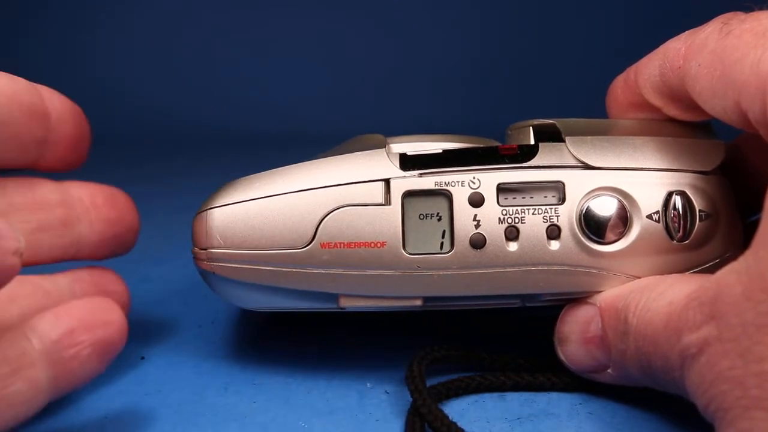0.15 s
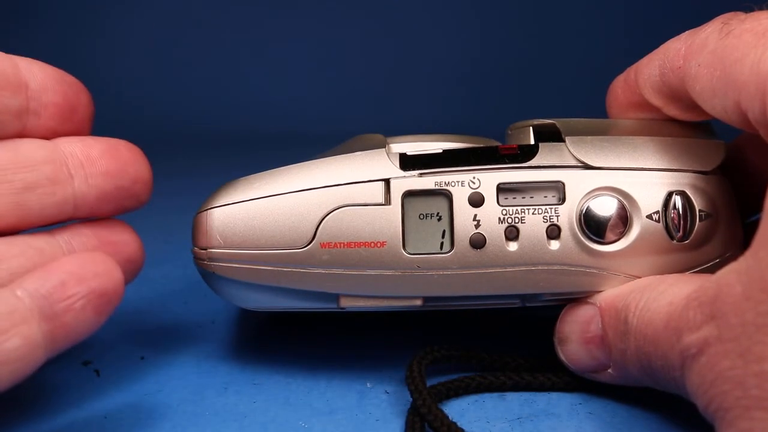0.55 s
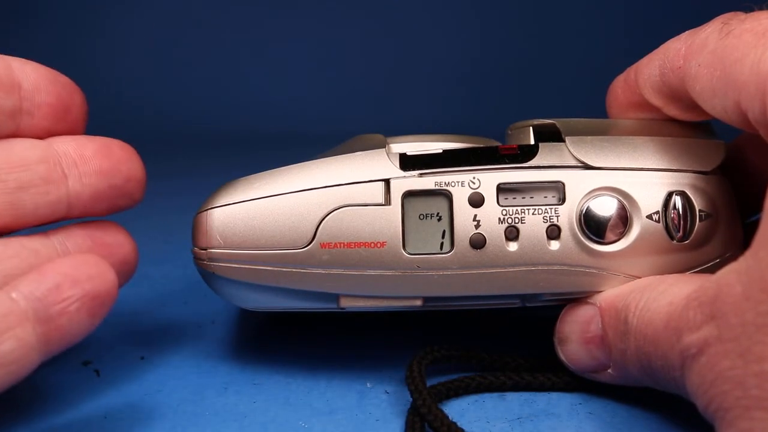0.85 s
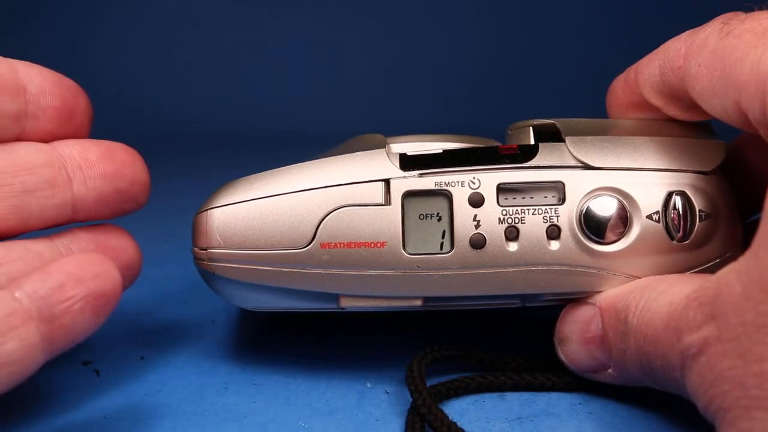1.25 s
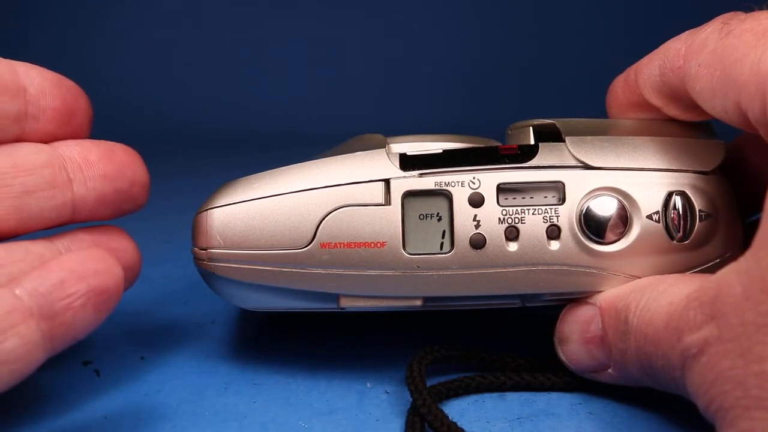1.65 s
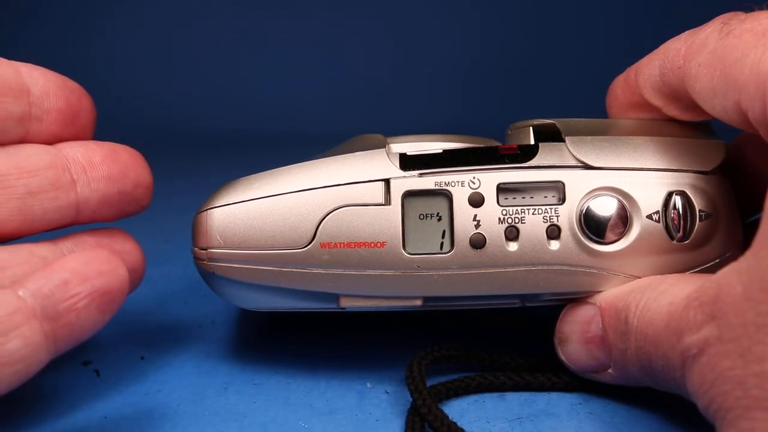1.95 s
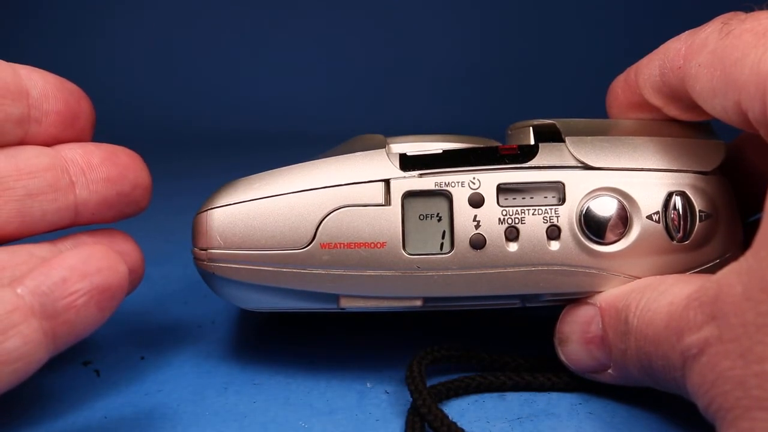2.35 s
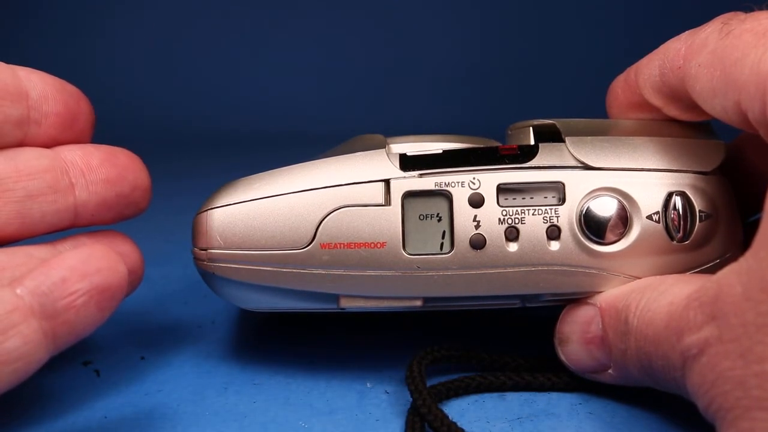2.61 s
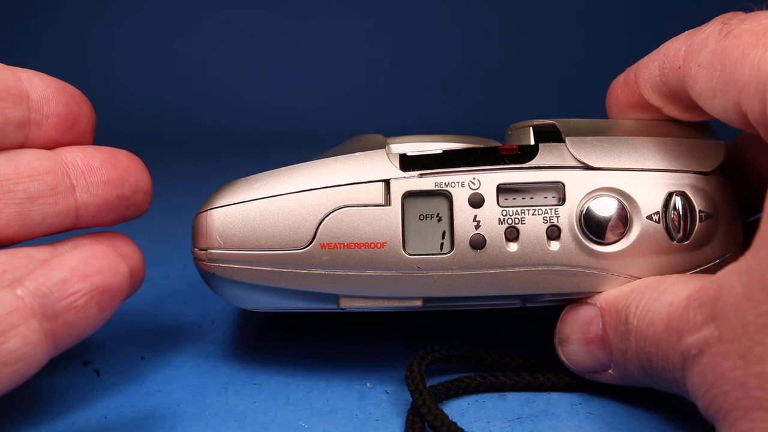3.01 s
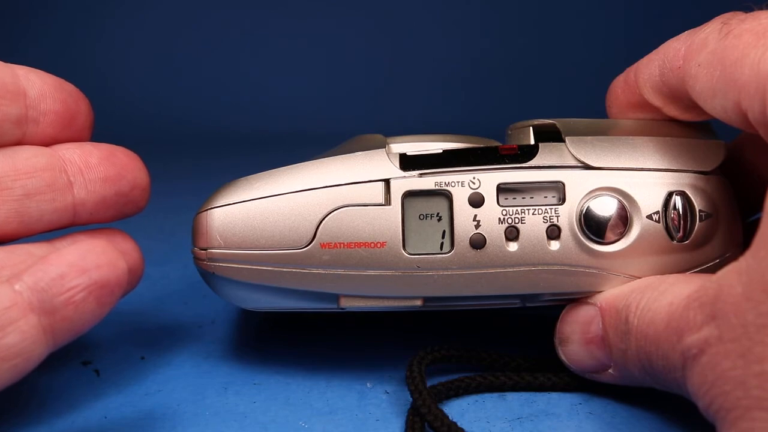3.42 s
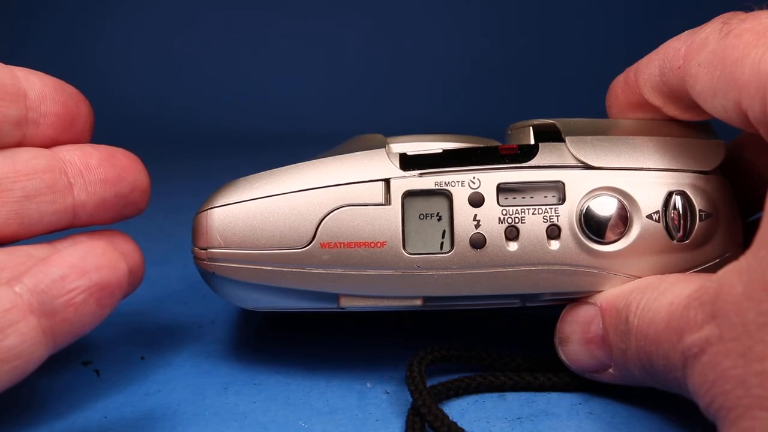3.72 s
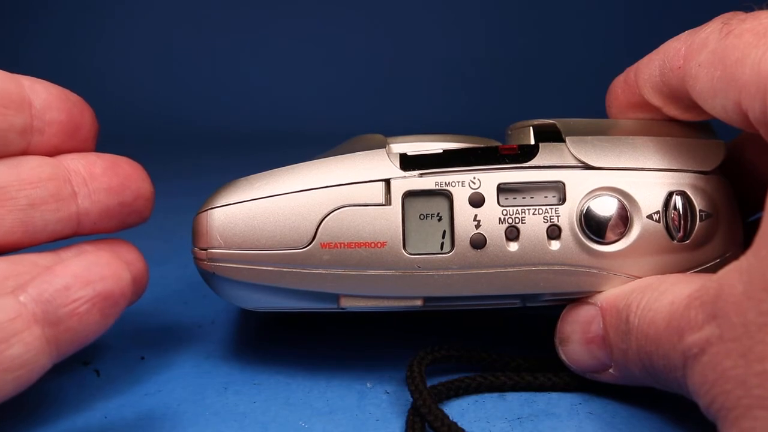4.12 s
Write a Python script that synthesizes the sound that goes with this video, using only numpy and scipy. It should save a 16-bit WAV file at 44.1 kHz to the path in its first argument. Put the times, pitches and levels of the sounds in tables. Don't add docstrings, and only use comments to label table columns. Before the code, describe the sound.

Close-up film rewind: a buzzing, gritty electric whir with slight pitch wavers, a tiny latch click, then a strained patch and freer, faster running.

```python
import sys
import numpy as np
from scipy import signal
from scipy.io import wavfile

SR = 44100
rng = np.random.default_rng(int(sys.argv[2]) if len(sys.argv) > 2 else 0)


def undo_db(level):
    steps = np.asarray(level, float) / 20
    return 10 ** steps


def log_audio(samples):
    frames = np.atleast_2d(samples).T
    limited = np.clip(frames, -1, 1)
    pcm = np.round(limited * 32767).astype(np.int16)
    wavfile.write(sys.argv[1], SR, pcm)


N = 188174
TIME = np.arange(N) / SR


def in_time(rows):
    s, *columns = np.transpose(rows)
    return [np.interp(TIME, s, column) for column in columns]


def at_hz(points, hz):
    point_hz, values = np.transpose(points)
    return np.interp(np.log(hz), np.log(point_hz), values)


def humps(rows):
    return sum(size * np.exp(-((TIME - s) / half_s) ** 2) for s, size, half_s in rows)


def drift(rate_hz):
    r = np.exp(-2 * np.pi * rate_hz * 32 / SR)
    coarse = rng.standard_normal(N // 32 + 2002)
    slow = signal.lfilter([1], [1, -2 * r, r * r], coarse)[2000:]
    return np.interp(np.arange(N) / 32, np.arange(len(slow)), slow / slow.std())


def wobble(depth, rate_hz, height_share=0.66):
    height = 1 + depth * height_share * drift(rate_hz)
    turned = np.exp(1j * depth * drift(rate_hz))
    return height * turned / np.sqrt(1 + (depth * height_share) ** 2)


def resonate(x, hz, width_hz):
    r = np.exp(-np.pi * width_hz / SR)
    poles = [1, -2 * r * np.cos(2 * np.pi * hz / SR), r * r]
    return signal.lfilter([(1 - r * r) / 2, 0, (r * r - 1) / 2], poles, x)


def shaft_turns():
    # time in seconds, shaft speed in Hz.
    speed = [(0, 207.2), (.4, 207.6), (.52, 209.7), (.7, 207.2), (.85, 206.8), (1.1, 205), (1.25, 207.4),
             (1.7, 208.4), (2.0, 206.8), (2.2, 208), (2.84, 207.3), (3.17, 207), (3.36, 209.7),
             (3.62, 212.5), (4.02, 212.4), (4.12, 216), (4.27, 216.3)]
    # time in seconds, change of shaft speed in Hz, half length in seconds.
    snags = [
        (.23, -3, .05),
        (.94, -2.3, .05),
        (1.37, -1, .05),
        (2.33, -1.2, .05),
        (2.62, -1.6, .08),
        (2.93, 3.8, .05),
        (3.08, 1.8, .04),
        (3.45, -2, .05),
        (3.72, -1, .04),
        (3.86, .8, .05),
    ]
    shaft_hz, = in_time(speed)
    jitter = 1 + .0008 * drift(25.) + .0005 * drift(6.)
    return np.cumsum((shaft_hz + humps(snags)) * jitter) / SR


def press():
    # start, attack, hold and release, all in seconds.
    stages = (2.94, 0.063, 0.43, 0.36)
    start, attack, hold, release = stages
    free = np.clip((TIME - start - attack - hold) / release, 0, 1)
    return np.clip((TIME - start) / attack, 0, 1) - free, free


def order_swells(mesh_left_db, mesh_right_db, mesh3_db, bite_db, pressed, free):
    # time in seconds, swell in dB, half length in seconds.
    sings = [(.05, 0, 0.088), (.53, 3, .05), (.73, 3, 0.076), (1.0, 2.5, .08), (1.2, 7, 0.092),
             (1.45, 1, .1), (1.95, 5, 0.1), (2.3, 6.5, .08), (2.43, 3, .04), (2.6, 3, 0.074),
             (2.82, 4, .04), (3.72, 6, .06), (3.92, 3, 0.057)]
    let_go = np.clip((TIME - 4.06) / 0.059, 0, 1)
    mesh_db = 2.0 * drift(9.9) + 1.65 * bite_db + 5 * (free - let_go)
    flutter_hz = 12
    return {
        3: -2 * free + 3.5 * let_go + (0.16 + 1.5 * free) * drift(flutter_hz),
        4: -5 * free,
        5: 1 * (pressed + free) + 1.6 * drift(5.8),
        6: -8 * pressed + 2.5 * drift(flutter_hz),
        7: 7.5 * pressed + 0.52 * drift(3.3),
        10: [mesh_left_db + mesh_db + 0.26 * drift(2.4), mesh_right_db + mesh_db + 0.49 * drift(0.73)],
        18: -14 * free,
        20: 8 * pressed - 4.5 * free + humps(sings) + 1.5 * drift(12.0),
        21: 3 * (pressed + free) + 2 * drift(3.),
        30: mesh3_db + 0.34 * drift(3.9)}


def hum(turns, swell_db, mesh_lead, pressed):
    # multiple of shaft speed (10, 20, 30, 40 are tooth mesh), left dB, right dB, left lead in rad.
    orders = [(1, -54, -54, -0.2), (2, -63, -60, -0.2), (2.5, -73, -73, -0.2), (3, -45, -44, -0.4),
              (4, -56, -53, -0.2), (5, -53, -50, -0.2), (6, -49, -46, -0.5), (7, -53, -52, -0.3),
              (8, -61, -56, -1.7), (9, -54, -53, -1.3), (10, -41, -42, 0.9), (10.6, -68, -56, -0.7),
              (11.5, -58, -52, 0.1), (15, -57, -55, -2.5), (18, -58, -52.5, 2.1), (20, -47, -45, -0.7),
              (21, -56, -48, -2.7), (23, -64, -59, -0.2), (30, -60, -54, 0.7), (40, -71, -71, 0.6)]
    # multiple, left dB, right dB, left lead in rad.
    faint_orders = [(6.5, -63, -60, -.4), (6.67, -64, -61, -.4), (11, -61, -50, 0.), (12, -62, -54, 0.),
                    (13, -62, -55, 1.), (17, -63, -61, 1.8), (19, -63, -61, -.4), (25.5, -67, -65, -.4),
                    (27, -68, -64, .5)]
    shell_db = {5: .3, 6: .5, 10: 0, 20: .3, 21: 3.5, 23: 2, 30: 2.5}
    out = np.zeros((2, N))
    for order, left_db, right_db, lead in orders + faint_orders:
        high = order > 8.7
        meshing = order % 10 == 0
        steadied = 1 - .5 * pressed * (order == 20)
        depth = (.4 if high else .23 * np.sqrt(order / 3)) * steadied
        contact = wobble(depth, (8 if high else 22) + 2.2 * order, .4 if high else .9)
        path = wobble(.5 * high * steadied, 35)
        if order == 10:
            lead = mesh_lead
        else:
            lead = lead + high * (.3 if meshing else .7) * drift(1.5)
        uneven_load_db = 2.0 * drift(0.58) * (order > 2)
        curves = np.broadcast_to(swell_db.get(order, uneven_load_db), (2, N))
        curves = curves - curves.mean(axis=1, keepdims=True)
        levels = undo_db(curves + [[left_db], [right_db]] + high * 1.5 + shell_db.get(order, 0))
        tone = contact * np.exp(2j * np.pi * (order * turns + rng.random())) * np.sqrt(2)
        out += levels * [(tone * np.exp(1j * lead)).real, (tone * path).real]
    return out


def rattle(turns, rattle_db, pan_db, panel_db, free, bite_db):
    # Hz, width in Hz,
    # left and right in dB per Hz, left-right likeness 0-1, left lead in rad.
    case = [(660, 260, -75, -74, .95, -.3), (900, 400, -79, -78, .93, -.3), (1150, 300, -74, -72, .92, -.3),
            (1430, 350, -68, -68, .85, -.3), (1900, 300, -72, -66.5, .4, -.8),
            (2200, 350, -70, -60.5, .2, -.3), (2430, 380, -71.5, -62, .55, 0.),
            (2950, 500, -73, -65, .35, 1.9), (3350, 450, -70, -66, .45, -.6),
            (3750, 300, -71, -66.5, .35, 1.8), (4150, 450, -70, -68, .3, -.4),
            (4800, 350, -74, -72, .4, -.5), (5400, 500, -73, -71, .7, -.4), (5850, 400, -78, -72, .3, 2.)]
    frame = [(6150, 450, -75, -72.5, .2, .8), (6850, 600, -80.5, -75.5, .65, 1.),
             (7600, 600, -87, -85, .1, 1.8), (8250, 400, -83, -81, .2, .5), (8700, 400, -82, -88, .3, 1.3),
             (9400, 800, -87, -87, .4, 1.5), (10350, 400, -87, -85.5, .35, 2.2),
             (11000, 500, -89, -85.5, .35, 1.1), (11800, 450, -85, -87, .4, 1.8),
             (12300, 450, -87, -87, .25, -1.8), (13000, 500, -92, -93, .3, -.8),
             (13650, 600, -87.5, -87.5, .45, -2.4), (14400, 800, -88.5, -88.5, .55, 3.1),
             (15500, 1200, -91.5, -91, .35, 3.1)]
    plates = [(1700, 250, -76, -75, .7, -.4), (1970, 40, -65.5, -61, .5, .2), (2940, 50, -73, -63, .4, 2.),
              (2203, 30, -70, -59, .4, -.7), (1468, 40, -68, -67, .8, -.3)]
    # wheel turns per shaft turn, depth in dB.
    throb = [(1, 1.2), (3, .8), (1 / 6, .45), (1 / 3, .6), (.43, .5), (.0825, .6)]
    # time in seconds, extra impact in dB.
    catches = [(.657, 3), (.838, 8), (0.892, 2), (1.072, 6), (1.556, 7), (1.838, 9), (2.107, 10), (2.93, 7),
               (3.098, 3.5), (3.348, 6.5), (3.388, 3), (3.419, 2), (3.47, 4), (3.681, 6), (3.816, 5),
               (3.937, 8), (3.972, 6), (4.03, 8)]
    free_case_db = {660: -4, 900: -5, 1430: 1, 1700: 5, 2200: -1, 2430: -1.5, 2940: 1, 3350: -2.5, 3750:
                    -3.5, 4150: 1.5, 6850: 3}
    catch_s = 0.002
    throb_db = sum(depth_db * np.cos(2 * np.pi * ratio * turns) for ratio, depth_db in throb)
    catch_db = humps([(s, db, catch_s) for s, db in catches])
    sizes = undo_db(throb_db + 0.17 * drift(220.0) + rattle_db - rattle_db.mean())
    impacts = rng.standard_normal((3, 2, N)) * sizes * np.sqrt(SR / 2)
    back_panel_db = panel_db - rattle_db - np.mean(panel_db - rattle_db)
    sway_db = 0.69 * drift(4.2)
    out = np.zeros((2, N))
    for k, (hz, width_hz, left_db, right_db, alike, lead) in enumerate(case + frame + plates):
        left, other = resonate(resonate(impacts[k % 3], hz, width_hz), hz, width_hz)
        quarter_ahead = np.gradient(left) / np.sin(2 * np.pi * hz / SR)
        alike = np.clip(alike, 0, 1)
        shared = np.cos(lead) * left - np.sin(lead) * quarter_ahead
        right = alike * shared + np.sqrt(1 - alike ** 2) * other
        level_db = free_case_db.get(hz, 0) * free
        if 2700 < hz < 3200:
            level_db = level_db + back_panel_db
        if 1500 < hz < 3500:
            level_db = level_db + catch_db
        if 1800 < hz < 2500:
            level_db = level_db + bite_db
        if hz > 4500:
            level_db = level_db + sway_db + 4 * free * np.log2(hz / 7400.0)
        buzz_db = 0.5 * drift(3.7) + 1.13 * drift(120.0)
        out += undo_db(level_db + buzz_db + [[left_db], [right_db]]) * [left, right]
    tilt_db = (pan_db - pan_db.mean()) / 2
    return out * undo_db([tilt_db, -tilt_db])


def latch():
    # time in seconds, peak in dB.
    clicks = [
        (1.99695, -8),
        (1.9984, -13.5),
    ]
    # Hz, left dB, right dB, 60 dB decay in seconds.
    tick_modes = [(3600, -2.5, 2, .006), (4350, -5.5, -5, .006), (5600, -12, -11, .005),
                  (6700, -8, -8, .006), (8100, -14, -15, .010), (9400, -19, -18, .007),
                  (12500, -30, -28, .006), (14800, -37, -39, .004)]
    rebound_modes = [(2550, -3, 4, .008), (1600, -8, -9, .016), (4300, -5, -8, .006),
                     (1250, -13, -12, .025)]
    out, t = np.zeros((2, N)), np.arange(SR // 20) / SR
    for (s, db), modes in zip(clicks, (tick_modes, rebound_modes)):
        at = round(s * SR)
        for hz, left_db, right_db, t60 in modes:
            ring = np.sin(2 * np.pi * hz * t) * undo_db(-60 * t / t60) * (1 - np.exp(-t / .0003))
            out[:, at:at + len(t)] += undo_db(db + np.array([[left_db], [right_db]])) * ring
    return out


def bumps():
    # time in seconds, peak in dB, centre in Hz, 60 dB decay in seconds.
    touches = [
        (3.03, -42, 850, .05),
        (3.14, -37, 750, .08),
        (3.15, -31, 1400, .05),
        (3.62, -39, 600, .05),
        (3.71, -41, 600, .06),
        (3.80, -43, 580, .06),
        (3.875, -43, 580, .05),
        (3.95, -46, 560, .05),
        (4.035, -52, 100, .12),
        (4.02, -43, 500, .07),
    ]
    out, t = np.zeros(N), np.arange(SR // 5) / SR
    for s, db, hz, t60 in touches:
        puff = rng.standard_normal(len(t)) * undo_db(-60 * t / t60) * (1 - np.exp(-t / 0.0046))
        puff = resonate(puff, hz, 0.4 * hz)
        at = round(s * SR)
        out[at:at + len(t)] += (undo_db(db) * puff / abs(puff).max())[:N - at]
    return out


def pair(white, hz):
    # Hz, left-right likeness.
    likeness = [(30, .38), (60, .4), (130, .45), (290, .5), (640, .8), (2000, .3), (15000, 0.)]
    alike = np.clip(at_hz(likeness, hz), -.99, .99)
    middle = np.sqrt(1 + alike) * white[0]
    side = np.sqrt(1 - alike) * white[1] * [[1], [-1]]
    return (middle + side) * np.sqrt(SR) / 2


def room():
    # Hz, air noise in dB per Hz.
    air = [(25, -93), (45, -90), (65, -84), (150, -83), (300, -84), (500, -83), (1500, -92), (8000, -104),
           (16000, -108)]
    mains_hz, mains_db = 119.3, -69.5
    edges = 22 * 2 ** np.arange(0, 9.6, .5)
    white = rng.standard_normal((2, 2, N))
    out = np.zeros((2, N))
    for k, (low, high) in enumerate(zip(edges, edges[1:])):
        hz = np.sqrt(low * high)
        band_pass = signal.butter(2, [low, high], "band", fs=SR, output="sos")
        out += undo_db(at_hz(air, hz)) * signal.sosfilt(band_pass, pair(white[k % 2], hz))
    buzz = (1 + 0.27 * drift(1.6)) * np.sin(2 * np.pi * mains_hz * TIME)
    return out + undo_db(mains_db) * np.sqrt(2) * buzz


def scene():
    # time in seconds, load on the gears in dB, turn of the case towards the right 0-1.
    hand = [(0.0, 0, 0), (0.55, 0.5, 0.46), (0.95, 1, 0.42), (1.4, -0.3, 0.06), (1.8, -0.5, 0.06),
            (2.3, 0.4, 0.13), (2.84, 0, 0.25), (3.15, 1.5, 0.58), (3.5, 0, 0.8), (3.9, -0.5, 0.85),
            (4.27, -3, 0.7)]
    # mesh left dB, mesh right dB, mesh left lead in rad,
    # third mesh overtone dB, rattle left-right dB, back panel dB.
    full_turn = (-8, 4.5, -5.5, -10, 0.5, 1.5)
    # time in seconds, level of the driven panels in dB.
    bite = [(0.0, -40), (0.08, -37.5), (0.89, -37), (1.75, -38.5), (1.83, -36.5), (2.97, -38), (3.11, -35),
            (3.18, -38), (3.43, -34.5), (3.62, -39.5), (3.67, -34.5), (3.75, -37), (3.86, -36.5),
            (3.9, -38), (3.94, -35.5), (4.09, -41.5), (4.11, -35.5), (4.27, -35.5)]
    load_db, turn = in_time(hand)
    mesh_left_db, mesh_right_db, lead, mesh3_db, pan_db, panel_db = np.outer(full_turn, turn)
    bite_db, = in_time(bite)
    bite_db = bite_db - bite_db.mean()
    pressed, free = press()
    turns = shaft_turns()
    swell_db = order_swells(mesh_left_db, mesh_right_db, mesh3_db, bite_db, pressed, free)
    motor = hum(turns, swell_db, 1.94 + lead + 0.26 * drift(2.9), pressed)
    pan_db = pan_db + 0.7 * drift(2.9)
    panel_db = load_db + panel_db + 3 * free + 1.0 * drift(2.8)
    gears = rattle(turns, load_db / 2, pan_db, panel_db, free, bite_db)
    return motor + gears + latch() + bumps() + room()


def top_cut(x):
    return signal.sosfilt(signal.butter(12, 15760, fs=SR, output="sos"), x)


def record(dry):
    low_pass = signal.cheby2(26, 50, 16100, fs=SR, output="sos")
    return top_cut(signal.sosfilt(low_pass, dry))


dry = scene()
out = record(dry)
log_audio(out)
```